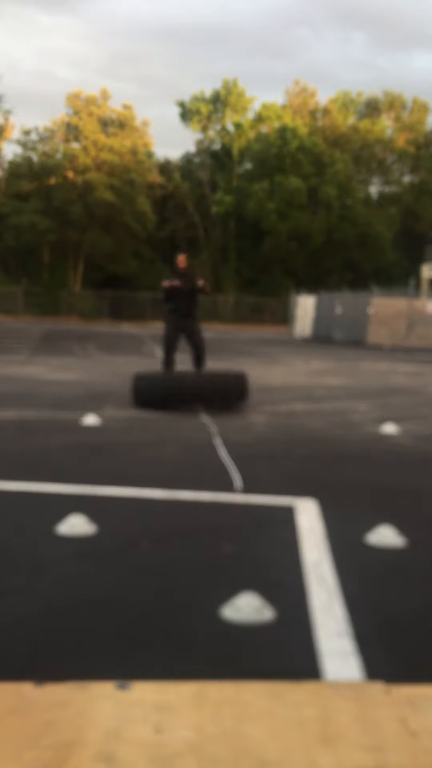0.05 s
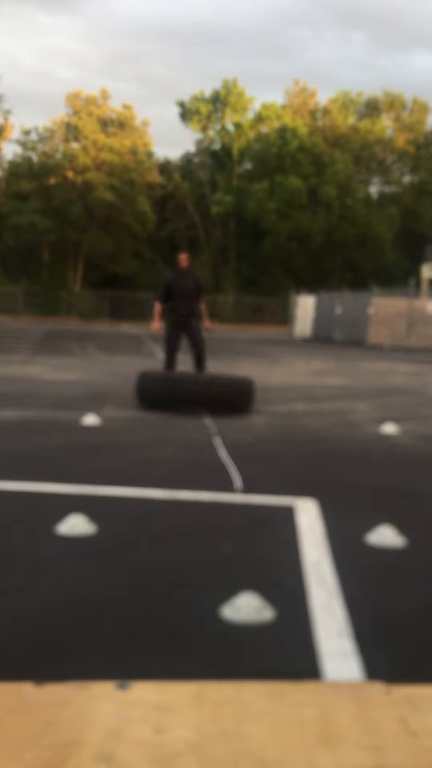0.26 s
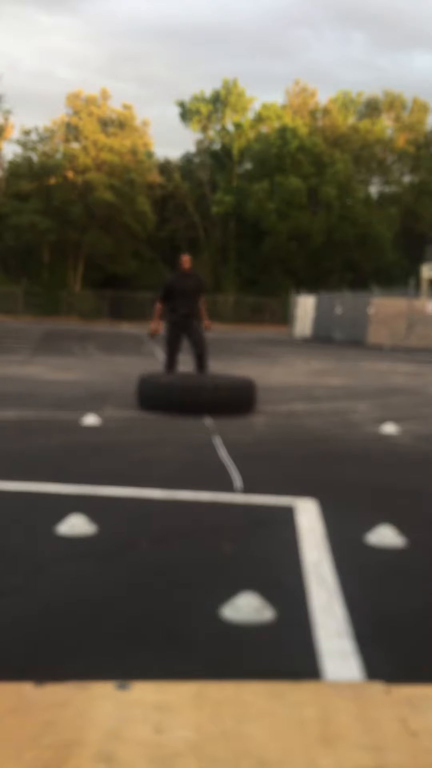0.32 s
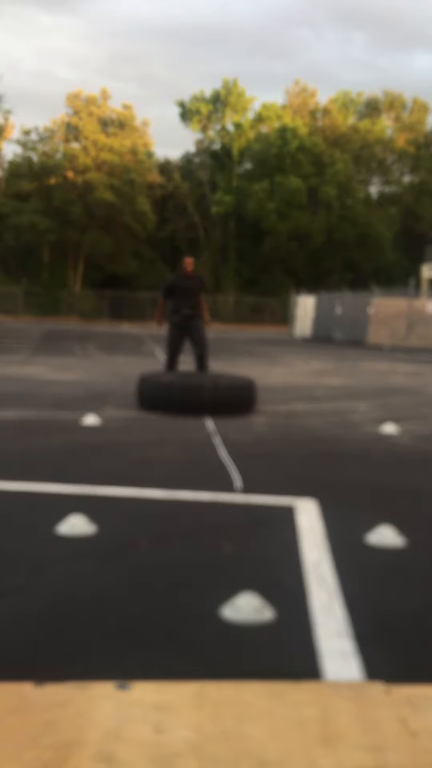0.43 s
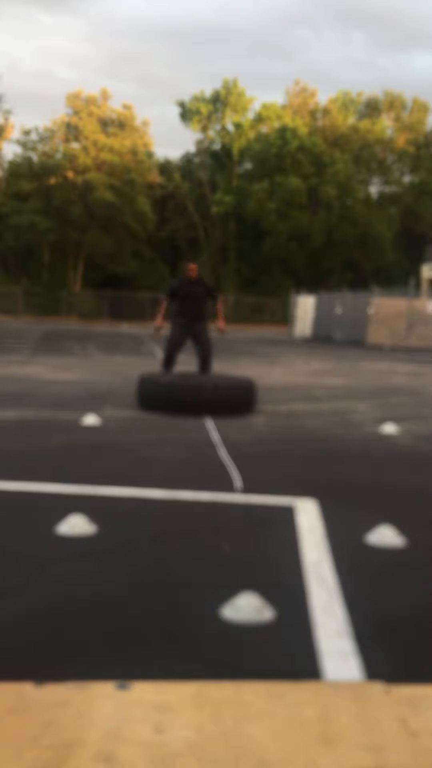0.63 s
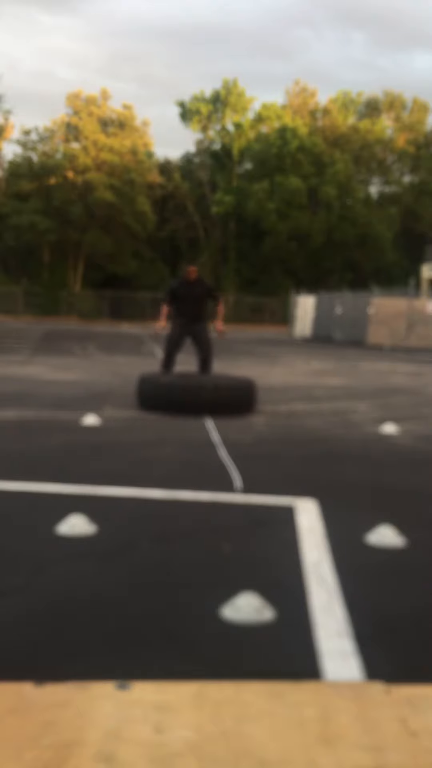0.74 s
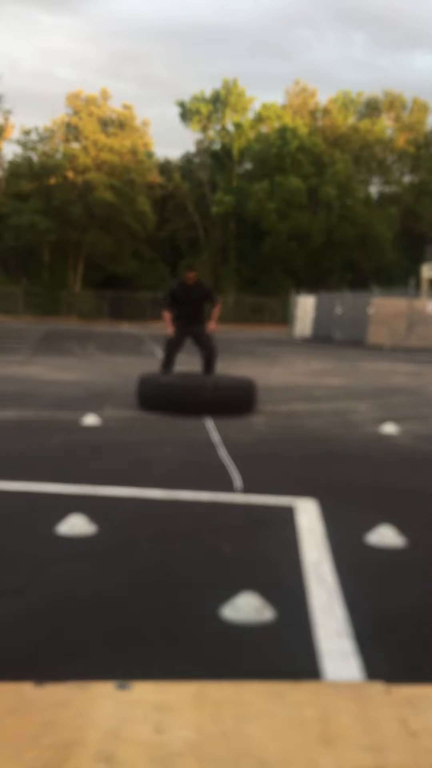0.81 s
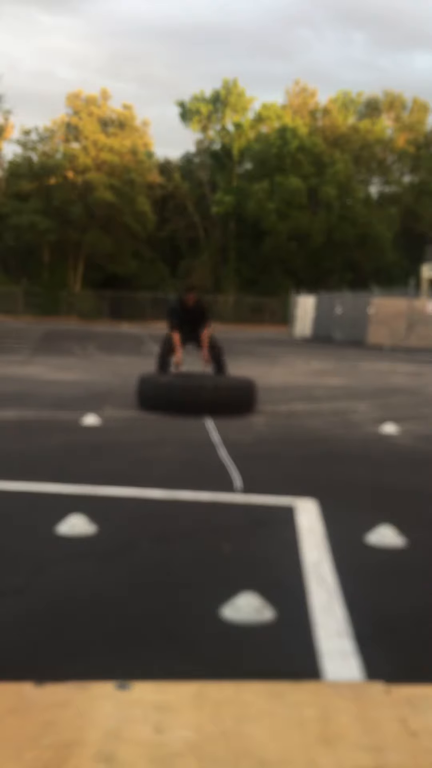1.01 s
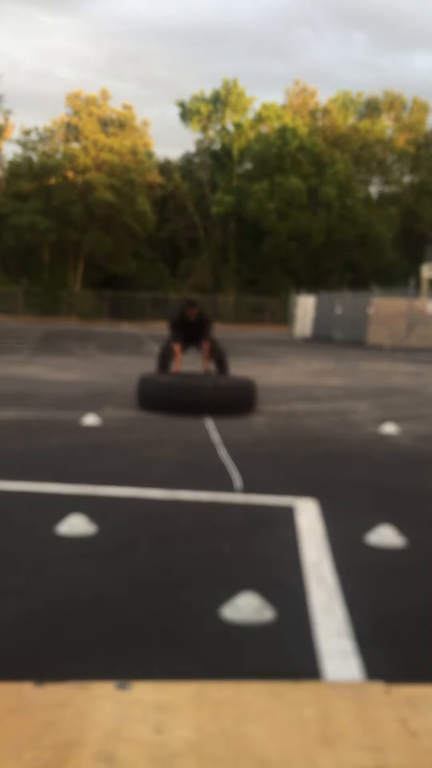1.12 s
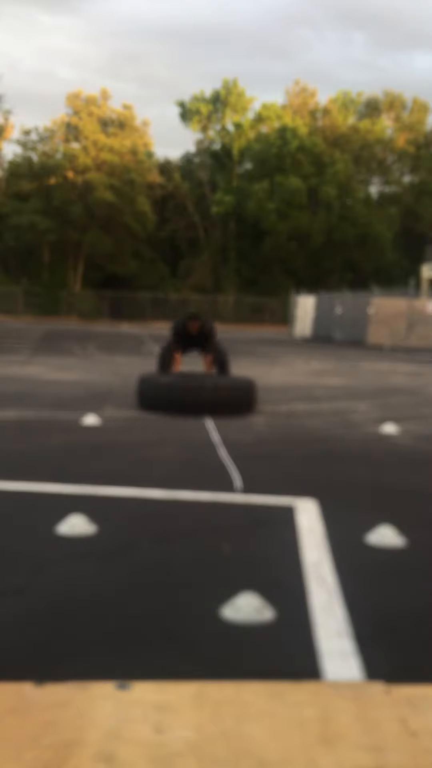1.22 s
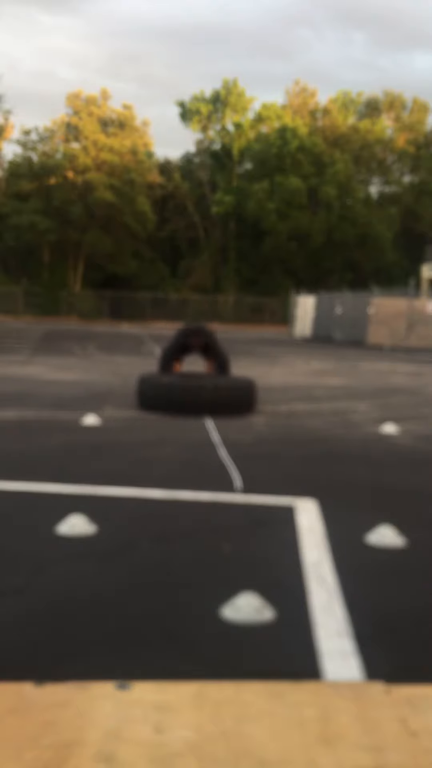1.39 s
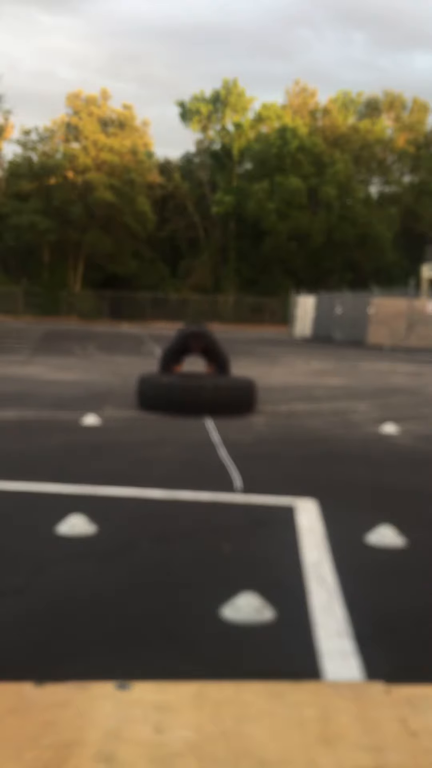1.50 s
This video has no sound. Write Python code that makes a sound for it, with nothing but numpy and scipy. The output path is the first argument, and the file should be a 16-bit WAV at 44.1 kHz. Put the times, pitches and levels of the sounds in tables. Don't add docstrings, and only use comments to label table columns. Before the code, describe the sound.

Loud rubbery slap and hollow bass thud of a large tire hitting pavement, followed by a weaker bounce and spreading outdoor reverberation; afterwards quiet footwork on grit over low hum, insects and far traffic, phone microphone.

```python
import sys
import numpy as np
from scipy import signal
from scipy.fft import rfft, irfft, next_fast_len
from scipy.io import wavfile
from scipy.ndimage import uniform_filter1d, map_coordinates

SR = 44100
rng = np.random.default_rng(int(sys.argv[2]) if len(sys.argv) > 2 else 0)


def gain_from_decibels(decibels):
    exponent = np.asarray(decibels, float) / 20
    return 10 ** exponent


def unload_audio(sound):
    columns = np.transpose(np.atleast_2d(sound))
    steps = np.round(np.clip(columns, -1, 1) * 32767)
    wavfile.write(sys.argv[1], SR, steps.astype(np.int16))


N = 68355
T = np.arange(N) / SR


def unit(x):
    return x / np.sqrt(np.mean(x ** 2) + 1e-20)


def along(points, hz):
    f, v = np.transpose(points)
    return np.interp(np.log(hz + 1), np.log(f + 1), v)


def wobble(rate):
    knots = rng.standard_normal(int(N * rate / SR) + 4)
    return map_coordinates(knots, [T * rate])


def filtered(x, response):
    m = next_fast_len(N + SR // 2)
    return irfft(rfft(x, m) * response(np.fft.rfftfreq(m, 1 / SR)), m)[:N]


def peak(f, hz, width_hz):
    return 1j * f * width_hz / (hz * hz - f * f + 1j * f * width_hz)


def coloured(noise, spectrum):
    return unit(filtered(noise, lambda f: gain_from_decibels(along(spectrum, f))))


def rush(spectrum, patchy_db):
    z = signal.stft(rng.standard_normal(N), nperseg=512)[2]
    field = uniform_filter1d(rng.standard_normal(z.shape), size=6, axis=0)
    field = uniform_filter1d(field, size=12, axis=1)
    patchy = signal.istft(z * gain_from_decibels(patchy_db * unit(field)), nperseg=512)[1][:N]
    return coloured(patchy, spectrum)


def tread_slaps():
    # start in seconds, rise in seconds, t60 in seconds, level in dB, brightness from 0 to 1.
    contacts = [
        (0.1915, 0.0012, 0.06, -37.5, 0),
        (0.1995, 0.0041, 0.042, -11, 0.13),
        (0.2058, .0015, 0.014, -2, 0.88),
        (0.2093, 0.0019, 0.098, -10.5, 0.09),
        (0.4489, 0.0032, 0.068, -26.5, 0.08),
    ]
    # frequency in Hz, level in dB per Hz.
    dull_colour = [(90, -42), (160, -1.5), (300, -0.5), (600, -8), (1050, -2), (1600, -7.5), (3500, -17.5),
                   (8000, -36.5)]
    # frequency in Hz, level in dB per Hz.
    bright_colour = [(290, -46), (500, -37), (1280, -2), (1950, 0.5), (3750, 3.5), (4800, -9.5), (9220, -3),
                     (16000, -10)]
    # frequency in Hz, half width in Hz, level in dB (not used: every resonance
    tread = [(1000, 37, 0), (3077, 120, 0), (5320, 360, -10), (6480, 660, -8), (6920, 330, -7),
             (8730, 150, -9), (9550, 58, -13)]
    tread_db, grain_db = 1, 4

    def through_tread(f):
        resonances = sum(2 * peak(f, hz, 2 * half_width) for hz, half_width, _ in tread)
        return gain_from_decibels(along(bright_colour, f)) * (1 + gain_from_decibels(tread_db) * resonances)

    out = np.zeros(N)
    for start, rise, t60, db, bright in contacts:
        t = np.maximum(T - start, 0)
        noise = rng.standard_normal((2, N)) * gain_from_decibels(grain_db * wobble(1200))
        dull = coloured(noise[0], dull_colour)
        sharp = unit(filtered(noise[1], through_tread))
        shape = np.minimum(t / rise, 1) ** 2 * gain_from_decibels(-60 * np.maximum(t - rise, 0) / t60)
        out += gain_from_decibels(db) * shape * ((1 - bright) * dull + bright * sharp)
    return out


def crack_rings():
    # frequency in Hz, level in dB, t60 in seconds.
    tones = [(1046, -17.5, 0.051), (2880, -27, .03), (3138, -13.5, 0.0452), (3675, -18, 0.044),
             (9330, -21.5, 0.017)]
    crack_s, rise_s = 0.2062, 0.00098
    t = np.maximum(T - crack_s, 0)
    rings = sum(gain_from_decibels(db - 60 * t / t60) * np.sin(2 * np.pi * hz * t) for hz, db, t60 in tones)
    return np.minimum(t / rise_s, 1) * rings


def air_booms():
    # start in seconds, level in dB, swell in seconds, hold in seconds, lowest pitch in Hz.
    squeezes = [
        (0.2112, -5, 0.023, 0.0257, 80.6),
        (.4566, -11.5, 0.00372, 0.025, 73.8),
    ]
    boom_hz, sag_after_s, sag_s = 94.55, 0.008, 0.0029
    octave_db, linger_db, linger_s = -21, -13, 0.5
    out = np.zeros(N)
    for start, db, swell, hold, low_hz in squeezes:
        t = np.maximum(T - start, 0)
        unsagged = (1 - np.tanh((t - swell - sag_after_s) / sag_s)) / 2
        hz = low_hz + (boom_hz - low_hz) * unsagged
        phase = 2 * np.pi * np.cumsum(hz * (t > 0)) / SR
        late = np.maximum(t - swell - hold, 0)
        choke_s = 0.13 * (swell + hold)
        decay = np.exp(-late / choke_s) + gain_from_decibels(linger_db - 60 * t / linger_s)
        shape = np.minimum(t / swell, 1) ** 0.89 * decay
        out += gain_from_decibels(db) * shape * (np.sin(phase) + gain_from_decibels(octave_db) * np.cos(2 * phase))
    return out


def carcass():
    # start in seconds, level in dB, rise in seconds.
    knocks = [
        (.212, -15, 0.0086),
        (.4505, -13.5, 0.0051),
    ]
    # frequency in Hz, level in dB, t60 in seconds.
    modes = [(166.1, -13, 1), (209, -4.5, 0.036), (289.8, 0.5, 0.085), (349, -9.5, 0.14), (423, -2, 0.083),
             (527.8, -1, 0.1), (690.4, -7.5, .08), (1116, 10, 0.014)]
    squash, squash_s = 1.545, 0.002
    out = np.zeros(N)
    for start, db, rise in knocks:
        t = np.maximum(T - start, 0)
        bent = t + squash * squash_s * (1 - np.exp(-t / squash_s))
        onset = np.minimum(t / rise, 1) ** 2
        for hz, mode_db, t60 in modes:
            out += gain_from_decibels(db + mode_db - 60 * t / t60) * onset * np.sin(2 * np.pi * hz * bent)
    return out


def delays(f, echoes):
    return sum(gain_from_decibels(db) * np.exp(-2j * np.pi * f * s) for s, db in echoes)


def shed_echoes(contact, boom):
    # delay in seconds, level in dB, top frequency in Hz.
    slap_echoes = [(.161, -25, 6600), (.174, -13, 860), (.318, -45.5, 12100)]
    # delay in seconds, level in dB.
    boom_echoes = [(.118, -19.5), (.176, -19.5), (.30, -22.5), (.38, -17.5)]
    smear_s = 0.0075
    walls = filtered(contact, lambda f: sum(
        delays(f, [(s, db)]) / (1 + 1j * f / top_hz) ** 3 for s, db, top_hz in slap_echoes))
    rough = rng.standard_normal(2000) * gain_from_decibels(-60 * np.arange(2000) / SR / smear_s)
    smeared = signal.fftconvolve(walls, rough / np.linalg.norm(rough))[:N]
    return 0.5 * walls + smeared + filtered(boom, lambda f: delays(f, boom_echoes))


def tail(spectrum, tilt_db, rise):
    # frequency in Hz, t60 in seconds.
    decay = [(80, 0.91), (300, 0.98), (1000, 0.97), (3000, 0.69), (8000, 0.37), (15000, 0.36)]
    tilt_hz = 500
    untilted = filtered(rng.standard_normal(N), lambda f: gain_from_decibels(along(spectrum, f)))
    tilted = filtered(rng.standard_normal(N),
                      lambda f: gain_from_decibels(along(spectrum, f) + tilt_db * np.log2(1 + f / tilt_hz)))
    hz, t, z = signal.stft(tilted / np.std(untilted), SR, nperseg=256)
    fading = z * gain_from_decibels(-60 * t / along(decay, hz)[:, None])
    x = signal.istft(fading, SR, nperseg=256)[1][:N]
    return x * np.minimum(T / rise, 1) * gain_from_decibels(1.5 * wobble(40))


def lot_and_trees():
    # start in seconds, level in dB, tilt in dB per octave.
    blows = [
        (.209, 2, 1),
        (.455, 0.5, -3.5),
    ]
    # frequency in Hz, level in dB per Hz.
    nearby_colour = [(76, -26.5), (130, -4.5), (300, -15.5), (700, -17), (1600, -22.5), (4000, -34),
                     (9000, -42), (16000, -61)]
    # frequency in Hz, level in dB per Hz.
    trees_colour = [(76, -49), (130, -6), (453, -25), (565, -17), (1060, -26), (3070, -34.5), (6340, -43),
                    (16000, -66.5)]
    lot_db, lot_rise_s = -30, 0.0041
    trees_db, trees_delay_s, trees_rise_s = -35.5, 0.12, 0.04
    out = np.zeros(N)
    for start, db, tilt_db in blows:
        nearby = tail(nearby_colour, tilt_db, lot_rise_s)
        trees = tail(trees_colour, tilt_db, trees_rise_s)
        out += gain_from_decibels(db + lot_db) * np.pad(nearby, (int(start * SR), 0))[:N]
        out += gain_from_decibels(db + trees_db) * np.pad(trees, (int((start + trees_delay_s) * SR), 0))[:N]
    return out


def grit_ticks():
    # start in seconds, peak level in dB, pitch in Hz.
    grains = [(.113, -47, 4650), (.147, -47.5, 3885), (0.729, -50.5, 4500), (0.819, -54.5, 5500),
              (0.871, -47, 3970), (0.898, -41.5, 4920), (0.968, -40, 2600), (.981, -47, 4440),
              (1.075, -51, 3310), (1.127, -51, 2540), (1.205, -40, 2815), (1.2595, -35.5, 5230),
              (1.273, -32.5, 2980), (1.323, -50, 2760), (1.373, -58, 2450), (1.419, -41, 3300),
              (1.439, -41, 2500), (1.501, -41, 3300)]
    tick_s, width, noise_db = 0.022, 0.43, -17
    out = np.zeros(N)
    for start, db, hz in grains:
        t = np.maximum(T - start, 0)
        grit = unit(filtered(rng.standard_normal(N), lambda f: (
            peak(f, hz, width * hz) ** 2 + gain_from_decibels(noise_db) * peak(f, 5300, 7700))))
        tick = gain_from_decibels(-60 * t / tick_s) * np.minimum(t / 0.0012, 1) * grit
        out += gain_from_decibels(db - 1.5) * tick / np.abs(tick).max()
    return out


def rustles():
    # start in seconds, length in seconds, level in dB, airy share from 0 to 1.
    moves = [(0.123, 0.096, -54.5, 0.42), (0.227, .2, -63, .4), (0.439, .145, -54.5, 0.75),
             (0.726, 0.331, -62.5, 0.25), (1.174, .45, -54.5, 0.36)]
    # frequency in Hz, level in dB per Hz.
    scuff_colour = [(1500, -33.5), (2500, -2), (3400, 0.5), (4500, -14.5), (9000, -19), (16000, -41)]
    # frequency in Hz, level in dB per Hz.
    air_colour = [(2500, -31), (6000, 7.5), (11000, -2), (16000, -4)]
    edge_s = 0.024
    scuff = gain_from_decibels(2 * wobble(45) + 3 * wobble(250)) * rush(scuff_colour, patchy_db=2.5)
    hiss = gain_from_decibels(1.512 * wobble(40) + 1.5 * wobble(220)) * rush(air_colour, patchy_db=-0.5)
    out = np.zeros(N)
    for start, length, db, airy in moves:
        fade = np.clip(np.minimum(T - start, start + length - T) / edge_s, 0, 1)
        out += gain_from_decibels(db) * fade * ((1 - airy) * scuff + airy * hiss)
    return out


def machine_hum():
    # time in seconds, level in dB.
    swells = [(0.0, -37.5), (0.158, -29.5), (0.436, -32.5), (0.876, -37), (1.078, -32.5), (1.268, -32.5),
              (1.55, -35.5)]
    hum_hz, width_hz, line_db = 90.2, 13.4, -10.5
    s, db = np.transpose(swells)
    drone = unit(filtered(rng.standard_normal(N), lambda f: peak(f, hum_hz, width_hz) ** 2))
    line = np.sin(2 * np.pi * np.cumsum(hum_hz + 2.74 * wobble(5.4)) / SR)
    return gain_from_decibels(np.interp(T, s, db)) * (drone + gain_from_decibels(line_db) * line)


def insects():
    # time in seconds, level in dB, pitch in Hz.
    song = [(0.0, -61, 6546), (0.384, -67, 6550), (0.91, -62, 6660), (1.03, -62.5, 6470),
            (1.17, -63.5, 6730), (1.32, -62, 6480), (1.446, -59.5, 6670), (1.55, -60.5, 6700)]
    width_hz, trill_hz, trill_depth = 220, 70, 0.3
    s, db, hz = np.transpose(song)
    buzz = [unit(filtered(rng.standard_normal(N), lambda f: 1 / (1 + (f / width_hz) ** 4)))
            for _ in range(2)]
    phase = 2 * np.pi * np.cumsum(np.interp(T, s, hz) + 40 * wobble(14)) / SR
    band = buzz[0] * np.cos(phase) + buzz[1] * np.sin(phase)
    trill = 1 + trill_depth * np.sin(2 * np.pi * trill_hz * T + wobble(14))
    return gain_from_decibels(np.interp(T, s, db) + 1.5 + 1.5 * wobble(4.7)) * trill * band


def traffic():
    # frequency in Hz, level in dB per Hz.
    road_colour = [(25, -7.5), (60, -4.5), (130, -5.5), (320, -13), (600, -29), (1200, -22), (3000, -35),
                   (5500, -50), (16000, -61.5)]
    return gain_from_decibels(-40) * rush(road_colour, patchy_db=0.7)


def scene():
    slap = tread_slaps() + crack_rings()
    boom, wall = air_booms(), carcass()
    answer = shed_echoes(slap + 0.35 * wall, boom) + lot_and_trees()
    movement = grit_ticks() + rustles()
    background = machine_hum() + insects() + traffic()
    return (slap + wall + boom + answer + movement + background)[None]


def top_cut(x):
    return signal.sosfilt(signal.butter(12, 16350, fs=SR, output="sos"), x)


def record(dry):
    bass_hz, ceiling, top_hz = 35, 0.95, 16350
    x = filtered(dry[0], lambda f: (f / bass_hz) ** 2 / (1 + (f / bass_hz) ** 2))
    x = x / (1 + np.abs(x / ceiling) ** 6) ** (1 / 6)
    x = filtered(x, lambda f: f < top_hz)
    return top_cut(x[None])


dry = scene()
out = record(dry)
unload_audio(out)
```